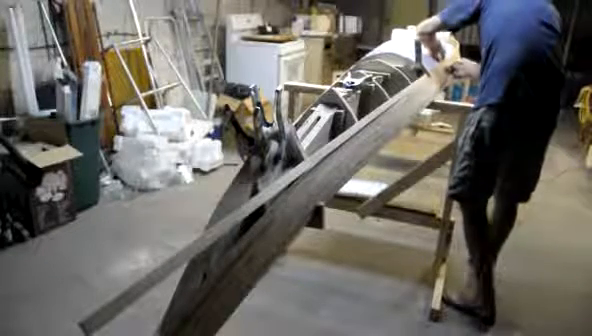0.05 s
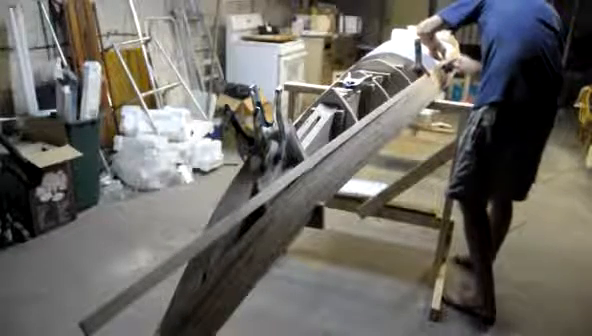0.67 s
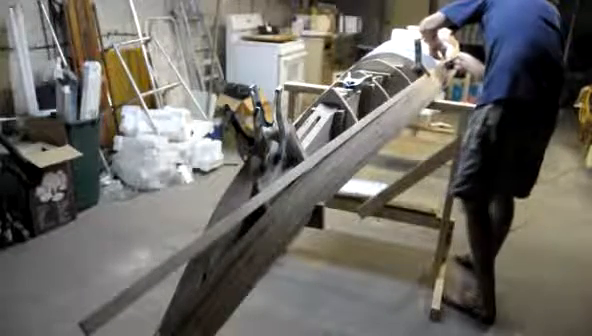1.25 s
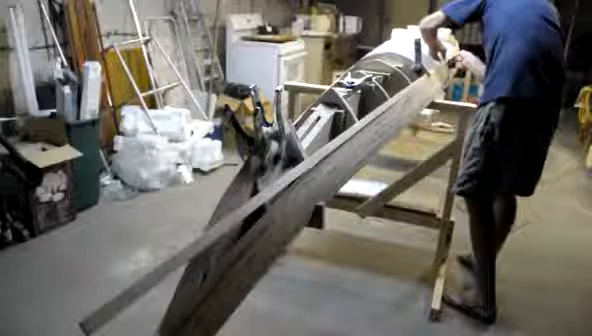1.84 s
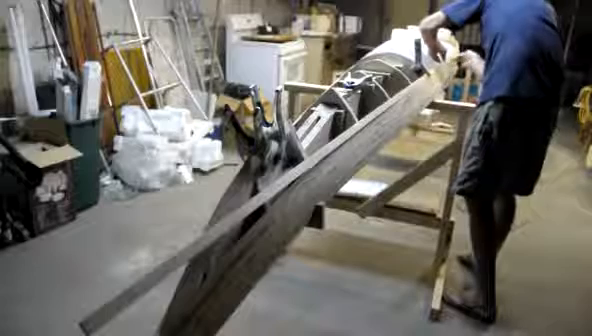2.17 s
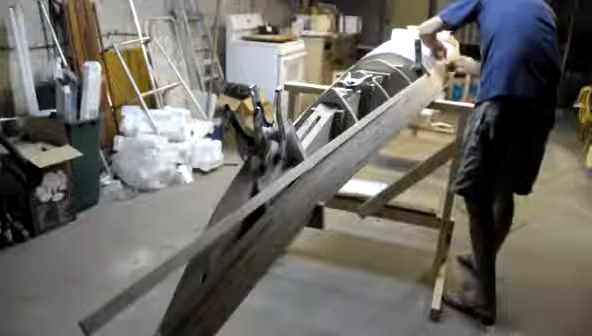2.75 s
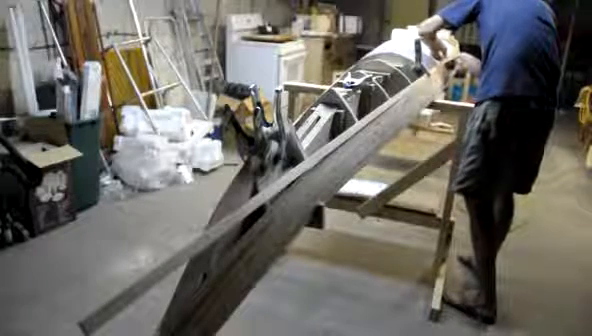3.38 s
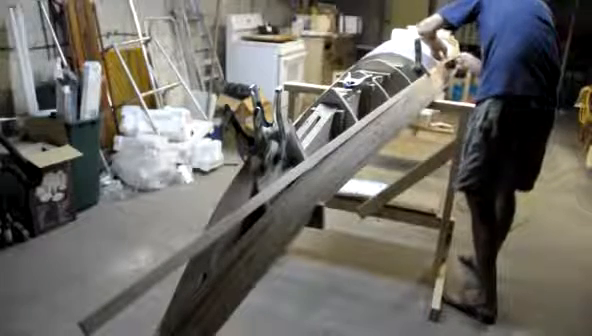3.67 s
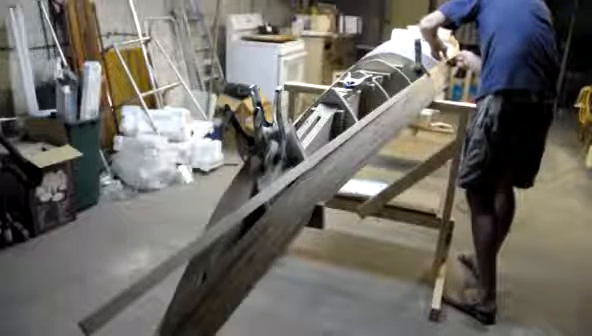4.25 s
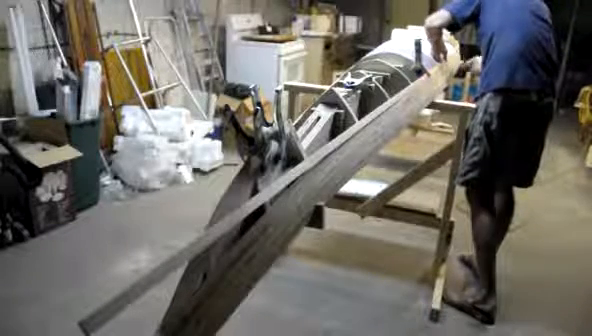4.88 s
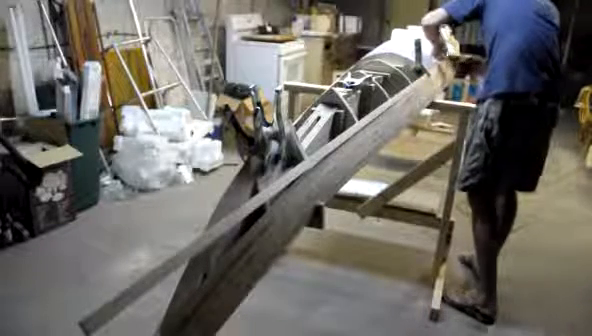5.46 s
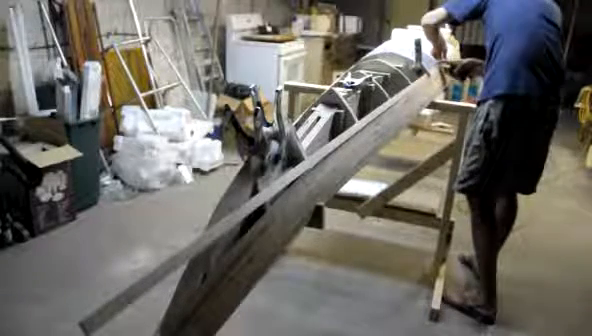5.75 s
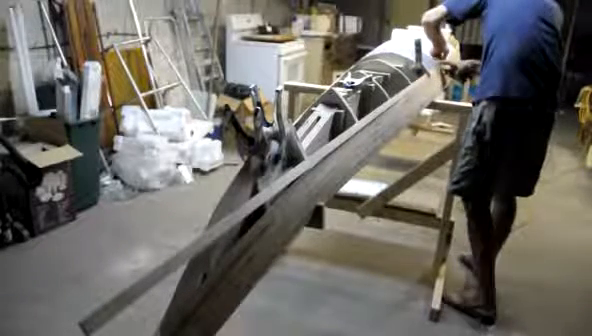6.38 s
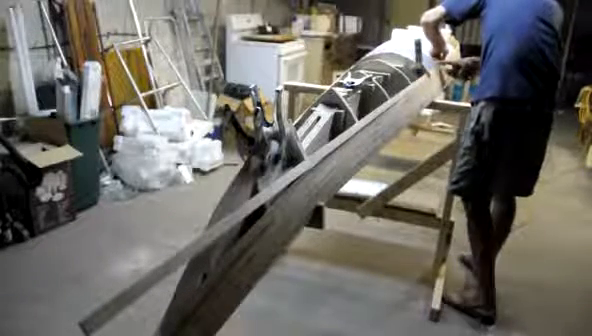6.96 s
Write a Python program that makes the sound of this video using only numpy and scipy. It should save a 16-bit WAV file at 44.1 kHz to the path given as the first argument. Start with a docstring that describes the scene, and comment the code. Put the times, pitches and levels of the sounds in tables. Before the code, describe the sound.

A hand plane makes three long rasping strokes along a wooden board, with knocks between them, over a faint workshop hum.

```python
"""A workshop: three long strokes of a hand plane along a board on trestles, a few metres away.
Fibres snap at the iron and ring the board while the shaving hisses; the iron snags and squeaks.
Between strokes the sole is drawn back and set down with a knock; after the last the board bounces.
Cluttered walls add a short tail. Room air, mains hum and a small machine's thin whirr lie beneath."""
import sys
import numpy as np
from scipy import signal
from scipy.fft import rfft, irfft, next_fast_len
from scipy.io import wavfile
from scipy.ndimage import uniform_filter1d

SR = 44100
rng = np.random.default_rng(int(sys.argv[2]) if len(sys.argv) > 2 else 0)


def wav_out(sig):
    """Save sig, one row per channel (or a flat mono array), as 16-bit PCM at SR to the path in sys.argv[1]."""
    wavfile.write(sys.argv[1], SR, np.round(np.clip(np.atleast_2d(sig).T, -1, 1) * 32767).astype(np.int16))


N = 309582
T = np.arange(N) / SR
RING_T = T[:SR // 2]  # time axis of impulse responses, s

# board modes: f/Hz, half width/Hz, energy/dB
BOARD_MODES = [(244, 7, -15.5), (253, 20, -16.5), (328, 12, -21.6), (356, 9, -9.6), (386, 8, -18),
               (416, 7, -2.4), (466, 15, 0.3), (485, 9, -4.2), (526, 12, -3.6), (548, 10, -8.5),
               (590, 16, -8.5), (633, 8, -18), (661, 13, -7), (721, 9, -21), (753, 12, -5.2),
               (788, 21, -4.6), (836, 8, -9.8), (869, 14, -9), (912, 9, -15), (946, 13, -9.7),
               (1023, 9, -14.8), (1094, 60, -20), (1144, 13, -20.5), (1292, 18, -18.8), (1382, 14, -12),
               (1444, 16, -12.4), (1530, 22, -15), (1558, 14, -14.2), (1605, 14, -16), (1690, 70, -20)]


def undb(db):
    """Decibels to gain."""
    return np.exp(np.asarray(db) * np.log(10) / 20)


def unit(x):
    """Scale to rms 1."""
    return x / np.sqrt(np.mean(x ** 2))


def noise():
    """White noise, rms 1."""
    return rng.standard_normal(N)


def walk(per_s):
    """Smooth random wander, rms 1."""
    steps = rng.standard_normal(size=8192)
    return unit(np.interp(T * per_s, np.arange(len(steps)), steps))


def held(start_s, end_s, fade_s):
    """Envelope: 1 from start to end, linear fades outside."""
    return np.interp(T, [start_s - fade_s, start_s, end_s, end_s + fade_s], [0, 1, 1, 0])


def swell(peak_s, rise_s, fall_s):
    """Lopsided Gaussian envelope, peak 1."""
    width_s = np.where(T < peak_s, rise_s, fall_s)
    return np.exp(-np.minimum(((T - peak_s) / width_s) ** 2, 20))


def steady(x):
    """Hold the power near 1; only quick flutter remains."""
    power = uniform_filter1d(x ** 2, size=2400)
    return x / np.sqrt(uniform_filter1d(power, size=1200))


def add(out, start_s, sound, peak_db):
    """Mix in a sound at a time and peak level."""
    i = int(start_s * SR)
    out[i:i + len(sound)] += (undb(peak_db) * sound / np.abs(sound).max())[:N - i]


def butter(x, order, hz, kind="low"):
    """Butterworth filter."""
    return signal.sosfilt(signal.butter(order, hz, kind, fs=SR, output="sos"), x)


def colour(x, spectrum):
    """Shape by (f/Hz, level/dB) points; rms 1."""
    hz, db = np.transpose(spectrum)
    n = next_fast_len(N, real=True)
    bins_hz = np.maximum(np.arange(n // 2 + 1) * SR / n, 1)
    gain = undb(np.interp(np.log(bins_hz), np.log(hz), db))
    return unit(irfft(rfft(x, n) * gain, n)[:N])


def ring(x, response):
    """Convolve with an impulse response."""
    return signal.fftconvolve(x, response)[:N]


def modes(rows):
    """Impulse response of damped modes: f/Hz, width/Hz, height/dB."""
    return sum(undb(db) * width_hz * np.exp(-np.pi * width_hz * RING_T) * np.sin(2 * np.pi * hz * RING_T)
               for hz, width_hz, db in rows)


def resonate(x, hz, half_width_hz):
    """One resonance applied twice for steep skirts; white noise keeps its power."""
    r = np.exp(-2 * np.pi * half_width_hz / SR)
    section = [1 - r, 0, r - 1, 1, -2 * r * np.cos(2 * np.pi * hz / SR), r * r]
    return signal.sosfilt([section, section], x + 1e-18) * np.sqrt(SR / np.pi / half_width_hz)


def radiate(x):
    """Small bodies give off little bass."""
    return butter(x, 3, hz=280, kind="high")


def detune(x, drift, per_s=11):
    """The shifting load of plane and hands bends pitch by about the fraction drift."""
    if drift == 0:
        return x
    shift_s = drift / per_s / np.sqrt(3) * walk(per_s)
    return np.interp(T + shift_s, T, x)


def sway(force, rows, drift=0):
    """Modes rung at steady total power; each swells and fades as the plane passes its nodes."""
    signs = np.sign(noise())
    swing = 0
    for k, (hz, half_width_hz, db) in enumerate(rows):
        share = undb(db + 3.2 * walk(per_s=14))
        mode = resonate(force * np.roll(signs, k), hz, half_width_hz)  # own sign for each snap
        swing += share * detune(mode, drift)
    return steady(swing)


def fractures(per_s, spread_db):
    """Dense snaps of wood fibres, mostly small, a few large."""
    size = undb(spread_db * np.minimum(rng.exponential(size=N), 5))
    occurs = rng.random(N) < per_s / SR
    return unit(occurs * size * np.sign(noise()))


def thump(bright_hz, pitch, damping):
    """The plane jolted: a softer contact rings it more dully, a firmer grip more briefly."""
    # plane resting on wood: f/Hz, width/Hz, height/dB
    plane_modes = [(454, 34.5, 4), (606, 40, -6.5), (815, 72, 0), (922.5, 34, 1), (1252, 47, -3),
                   (1852, 86, -16.5)]
    contact_s = 2.7 / bright_hz
    onset = (1 - np.exp(-RING_T / contact_s)) ** 2
    body = modes([(hz * pitch, width_hz * damping, db) for hz, width_hz, db in plane_modes])
    return radiate(butter(body * onset, 2, min(bright_hz, SR / 4)))


def background(mains_hz=60, waver_hz=4.5):
    """Room air, mains hum, and a small machine's narrow-band whirr and wavering whine."""
    # air spectrum: f/Hz, relative density/dB
    air_spectrum = [(20, -21), (45, -5), (70, -5), (130, 5), (200, 3.5), (470, 6.5), (750, 2), (1300, -1.5),
                    (1800, -5), (3300, -7.5), (4100, -10), (4800, -11), (5400, -18.5), (6600, -32)]
    # mains harmonics: multiple, rms/dB
    harmonics = [(2, -72.5), (4, -62.5), (6, -58.5)]
    # machine resonances: f/Hz, half width/Hz, rms/dB
    whirr_bands = [(513, 18, -58.5), (2930, 60, -68), (3538, 67, -63.5), (3723, 120, -59),
                   (4000, 55, -66.5), (4584, 120, -60.5), (4500, 170, -64.5), (5220, 90, -76.5),
                   (6050, 70, -83), (6430, 59, -77)]
    # machine whistles: f/Hz, rms/dB
    whine_tones = [(3494, -68), (3758, -66), (4592, -67.5)]
    air = undb(-54.5) * colour(noise(), air_spectrum)
    hum = whirr = whine = 0
    for multiple, db in harmonics:
        gain = undb(db + 1.4 * walk(per_s=1.4))
        hum += gain * unit(np.sin(2 * np.pi * (multiple * mains_hz * T + rng.random())))
    stir = noise()
    for k, (hz, half_width_hz, db) in enumerate(whirr_bands):
        whirr += undb(db) * resonate(np.roll(stir, k * SR // 2), hz, half_width_hz)
    for hz, db in whine_tones:
        cycles = np.cumsum(hz + waver_hz * walk(per_s=45)) / SR
        whine += undb(db) * unit(np.sin(2 * np.pi * cycles))
    return air + hum + whirr + whine


def ticks():
    """Tool and breaking shaving click: a brief scratch through one resonance."""
    # clicks: t/s, peak/dB, f/Hz, half width/Hz, scratch decay/s
    clicks = [(1.821, -44, 5450, 300, .005), (1.826, -43, 3900, 1100, .009), (2.22, -37, 2000, 280, .019),
              (6.222, -30.5, 2960, 900, 0.027), (6.229, -33, 4400, 350, .008),
              (6.227, -34, 5380, 250, .008), (6.71, -44, 3370, 40, .03), (6.711, -44, 2800, 350, .025),
              (6.722, -52, 1880, 150, .04), (6.874, -44.5, 2010, 300, 0.035)]
    out = np.zeros(N)
    for s, db, hz, half_width_hz, decay_s in clicks:
        scratch = rng.standard_normal(len(RING_T)) * np.exp(-RING_T / decay_s)
        add(out, s, resonate(scratch, hz, half_width_hz), db)
    return out


def sliding():
    """The sole rubs without cutting; dragged over the board's end, it makes one mode groan."""
    # passes: t of top speed/s, relative level/dB, rise/s, fall/s
    passes = [(1.385, -55, 0.013, 0.019), (1.445, -47, 0.065, 0.084), (2.025, -47, 0.078, 0.078),
              (2.228, -52, 0.029, 0.07), (3.915, -52.5, 0.032, 0.05), (4.712, -50.5, 0.042, 0.028),
              (6.405, -47.5, 0.016, 0.037), (6.46, -53, 0.028, 0.092)]
    # groans: start/s, end/s, level/dB, f/Hz
    drags = [(4.622, 4.727, -48.5, 459), (4.743, 4.904, -45.5, 417)]
    # rubbing spectrum: f/Hz, relative density/dB
    sole_spectrum = [(100, -42.5), (250, -6), (450, -1), (1300, -1.5), (2000, -5.5), (3000, -6), (4300, -9),
                     (5200, -15.5), (6300, -25.5), (7300, -54)]
    rub = fractures(per_s=9000, spread_db=1.2)
    speed = sum(undb(db) * swell(s, rise_s, fall_s) for s, db, rise_s, fall_s in passes)
    groan = sum(undb(db) * held(start_s, end_s, fade_s=0.039) * sway(rub, [(hz, 13, 0)])
                for start_s, end_s, db, hz in drags)
    swish = colour(rub * undb(0.62 * walk(per_s=69)), sole_spectrum)
    return undb(5.0) * speed * swish + groan


def rebounds(hz=243, swell_s=0.036):
    """The board bounces on its trestle, low and hollow, as the plane lifts."""
    # bounces: t/s, peak/dB
    bounces = [(6.265, -36), (6.356, -41), (6.414, -47)]
    out = np.zeros(N)
    boom = np.sin(2 * np.pi * hz * RING_T) * RING_T * np.exp(-(RING_T / swell_s) ** 2 / 2)
    for s, db in bounces:
        add(out, s, boom, db)
    return out


def knocks(crack_decay_s=0.038, force_decay_s=0.03):
    """The plane, set down or bumped, thumps, scuffs the wood and rings the board."""
    # contacts: t/s, thump peak/dB, brightness/Hz, crack re thump/dB, board peak/dB,
    # pitch ratio, damping ratio
    contacts = [(1.82, -21.5, 3500, -24, -39, 1, 1.4), (1.829, -17.5, 577, -38, -28, 1.02, 1.4),
                (1.834, -26, 2400, -19, -31.5, 1.05, 1.4), (2.212, -34.5, 3000, -14, -53, 1.18, 0.92),
                (2.229, -29.5, 1100, -17, -49, 1.04, 1.3), (3.898, -37.5, 420, -21, -50, 0.98, .8),
                (3.94, -38, 500, -21, -55, 0.78, 0.54), (4.123, -35, 332, -11, -49, 0.95, 1.1),
                (4.546, -33, 2600, -6.5, -37, 1.02, 0.91), (4.556, -27, 756, -23, -38.5, 1.0, 0.59),
                (4.574, -35.5, 900, -21.5, -45, 1.02, 0.49), (4.716, -30, 1500, -18.5, -48, 1.03, 2),
                (6.389, -31, 1500, -10, -36.5, 0.94, 1)]
    # mode weighting for a blow on the board's edge: f/Hz, gain/dB
    edge_gains = [(240, -2), (360, -12), (470, -8.5), (600, -3.5), (780, 4.5), (940, 7), (1250, 9),
                  (1450, -4), (1700, -1.5)]
    edge_hz, edge_db = np.transpose(edge_gains)
    board = modes([(hz, 2 * half_width_hz,
                    db + np.interp(hz, edge_hz, edge_db) - 10 * np.log10(half_width_hz))
                   for hz, half_width_hz, db in BOARD_MODES])
    out = np.zeros(N)
    for s, db, bright_hz, crack_db, board_db, pitch, damping in contacts:
        add(out, s, thump(bright_hz, pitch, damping), db)
        onset = 1 - np.exp(-RING_T * bright_hz / 4)
        crack = rng.standard_normal(len(RING_T)) * np.exp(-RING_T / crack_decay_s) * onset
        add(out, s, butter(crack, 3, hz=[600, 2600], kind="band"), db + crack_db)
        force = crack * np.exp(-RING_T / force_decay_s)
        add(out, s, radiate(ring(force, board)), board_db)
    return out


def snags():
    """The iron catches in the grain and jolts the plane."""
    # catches: t/s, peak/dB, pitch ratio
    catches = [(0.199, -22, 1.14), (0.452, -25.5, 1.07), (0.575, -23.5, 1.07), (0.742, -22, 1.08),
               (0.79, -23, .93), (0.86, -20, 1.03), (0.953, -20.5, 0.86), (1.055, -16.5, 1.07),
               (1.085, -19, 1.17), (2.482, -24, 1.1), (2.588, -21, 1.09), (2.635, -22, 0.85),
               (2.822, -25, 0.97), (2.891, -32, 1.07), (3.185, -18.5, 1.04), (3.428, -24.5, .96),
               (3.567, -16, 1.063), (5.04, -25.5, .92), (5.106, -23, 0.94), (5.224, -24.5, .95),
               (5.277, -26, 0.87), (5.528, -31.5, 1.05), (5.83, -25.5, 1.1), (6.018, -17, 1),
               (6.161, -16.5, 1.06), (6.175, -10.5, 1)]
    out = np.zeros(N)
    for s, db, pitch in catches:
        add(out, s, thump(bright_hz=490, pitch=pitch, damping=1.68), db)
    return out


def squeaks():
    """The iron's chatter narrows to one resonance: broad ones rasp, narrow ones whistle."""
    # chatter bursts: centre t/s, level/dB, half length/s, f/Hz, half width/Hz
    bursts = [(0.223, -42.5, 0.12, 1430, 85), (0.4, -58.5, 0.33, 4880, 12), (0.35, -71, 0.3, 6160, 19),
              (0.58, -43, 0.1, 1378, 12), (0.677, -33.5, 0.03, 861, 19), (0.728, -34, 0.035, 1385, 20),
              (0.758, -33.5, 0.026, 770, 30), (1.04, -34.5, 0.035, 1443, 56), (1.096, -27, 0.016, 780, 79),
              (1.444, -44, 0.063, 1930, 440), (2.56, -43, 0.12, 1385, 35), (2.982, -50, 0.22, 1390, 20),
              (3.275, -32, 0.041, 756, 14), (3.642, -26, 0.037, 756, 29), (4.71, -41.5, 0.014, 1445, 140),
              (4.721, -34.5, 0.01, 794, 57), (4.915, -37.5, 0.023, 860, 83), (4.907, -40, 0.037, 1405, 42),
              (5.03, -40.5, 0.018, 1390, 50), (5.287, -28, 0.016, 773, 37), (5.55, -49.5, .09, 1377, 28),
              (5.973, -36, 0.07, 1614, 140), (6.097, -33, 0.016, 1560, 66), (6.402, -48, 0.016, 1560, 300)]
    out, chatter = np.zeros(N), noise()
    for s, db, half_s, hz, half_width_hz in bursts:
        near = np.abs(T - s) < 0.1 + 3 * half_s
        envelope = undb(db) * np.exp(-((T[near] - s) / half_s) ** 2)
        out[near] += envelope * steady(resonate(chatter[near], hz, half_width_hz))
    return out


def cutting(usual_push_db=-33.5, usual_hiss_db=-41.5, drift=0.006):
    """The iron sticks and slips; fibres snap in bunches, driving board, shaving and iron."""
    # one curve per stroke: t/s, relative push on the board/dB, relative shaving hiss/dB
    strokes = [
        [(0.02, -69, -63), (0.062, -44, -47), (0.124, -30.5, -40.5), (0.2, -26, -39), (0.39, -39, -48),
         (0.46, -29.5, -45), (0.486, -33.5, -43), (0.654, -31.5, -41.5), (0.7, -39.5, -37.5),
         (0.736, -27, -37.5), (0.79, -25.5, -37), (0.84, -30.5, -39), (0.96, -23, -38), (1.002, -26, -40.5),
         (1.088, -23, -36), (1.19, -47, -55.5), (1.2, -50, -56.5)],
        [(2.22, -49, -57), (2.328, -39, -46.5), (2.59, -23, -40.5), (2.722, -30.5, -45.5), (3.09, -34, -47.5),
         (3.186, -25, -47), (3.348, -38, -41), (3.434, -22.5, -38.5), (3.47, -32.5, -40.5), (3.584, -26, -38.5),
         (3.614, -34, -36.5), (3.65, -23.5, -36.5), (3.706, -55, -37.5), (3.79, -52, -57.5)],
        [(4.78, -57, -51), (4.99, -36, -44.5), (5.025, -32.5, -43), (5.116, -26.5, -45.5),
         (5.146, -35.5, -46.5), (5.236, -27.5, -44), (5.486, -39, -49), (5.534, -32, -45.5),
         (5.696, -42.5, -53), (5.862, -24, -45), (5.956, -40.5, -39), (6.044, -20, -41), (6.148, -24, -38),
         (6.176, -26, -34.5), (6.31, -61, -48.5)],
    ]
    # weight flexes the board's lowest modes: start/s, end/s, relative level/dB
    flexes = [(0.112, 1.128, -47.5), (2.586, 3.542, -45), (5.09, 5.333, -44.5), (5.41, 5.958, -50),
              (6.047, 6.255, -44)]
    # shaving spectrum: f/Hz, relative density/dB
    shaving_spectrum = [(150, -31.5), (330, -29.5), (600, 13.5), (1100, 1.5), (1800, 1.5), (2150, -1),
                        (2500, -5), (3200, -2), (3800, 0), (4700, -3.5), (5300, -9.5), (6200, -16.5),
                        (6800, -30.5), (7400, -30.5)]
    # thin ring of iron and shaving: f/Hz, half width/Hz, energy/dB
    iron_modes = [(2098, 120, 0.5), (2164, 22, -9.5), (2740, 160, -1.5), (3464, 43, -7.5), (4856, 67, -6.5)]
    snaps = fractures(per_s=5000, spread_db=2.5)
    chatter = walk(per_s=210) + 0.51 * walk(per_s=50)
    force = snaps * undb(2.1 * chatter)

    times_s, pushes_db, hisses_db = np.concatenate(strokes).T
    push_db, hiss_db = np.interp(T, times_s, pushes_db), np.interp(T, times_s, hisses_db)
    harder_db, faster_db = push_db - usual_push_db, hiss_db - usual_hiss_db
    in_wood = sum(held(stroke[0][0], stroke[-1][0], fade_s=0.069) for stroke in strokes)
    push, hiss = in_wood * undb(push_db), in_wood * undb(hiss_db)
    # a harder, faster cut brings out the upper modes
    bite = in_wood * undb(-35 + 0.36 * harder_db + 0.96 * faster_db)
    weight = sum(undb(db) * held(start_s, end_s, fade_s=0.07) for start_s, end_s, db in flexes)
    flex = weight * undb(0.42 * harder_db)

    bands = [(flex, 0, 300, 0), (push, 300, 700, drift), (bite, 700, 2000, drift / 3)]
    board = 0
    for envelope, low_hz, high_hz, band_drift in bands:
        band_modes = [mode for mode in BOARD_MODES if low_hz <= mode[0] < high_hz]
        board += envelope * sway(force, band_modes, band_drift)
    shaving = hiss * colour(snaps * undb(0.17 * chatter), shaving_spectrum)
    iron = hiss * sway(snaps, iron_modes)
    return undb(-0.8) * board + undb(4.0) * shaving + undb(-7.0) * iron


def workshop(x, wet_db, t60_s, treble_t60_s, patterns):
    """Cluttered walls return a diffuse tail, treble dying first; echoes shift as the plane moves."""
    echoes, wet = 0, undb(wet_db)
    for k in range(patterns):
        wash = rng.standard_normal(len(RING_T)) * (RING_T > 0.006)
        low = butter(wash, 1, hz=1800)
        tail = low * 1000 ** (-RING_T / t60_s) + (wash - low) * 1000 ** (-RING_T / treble_t60_s)
        offset = (4 * T - k + 1) % patterns - 1  # 4 crossfades per second
        share = np.cos(np.pi / 2 * np.clip(offset, -1, 1))
        echoes += ring(x * share, tail / np.linalg.norm(tail))
    return (x + wet * echoes) / np.hypot(1, wet)


def scene():
    """Planing in the room over the background; mono."""
    work = cutting() + squeaks() + snags() + knocks() + rebounds() + sliding() + ticks()
    in_room = workshop(work, wet_db=-7.5, t60_s=0.37, treble_t60_s=0.27, patterns=4)
    return (in_room + background())[None]


def record(dry):
    """Steep treble cut."""
    top_hz = 6950
    return signal.sosfilt(signal.cheby1(12, 0.3, top_hz, fs=SR, output="sos"), dry)


dry = scene()
out = record(dry)
wav_out(out)
```